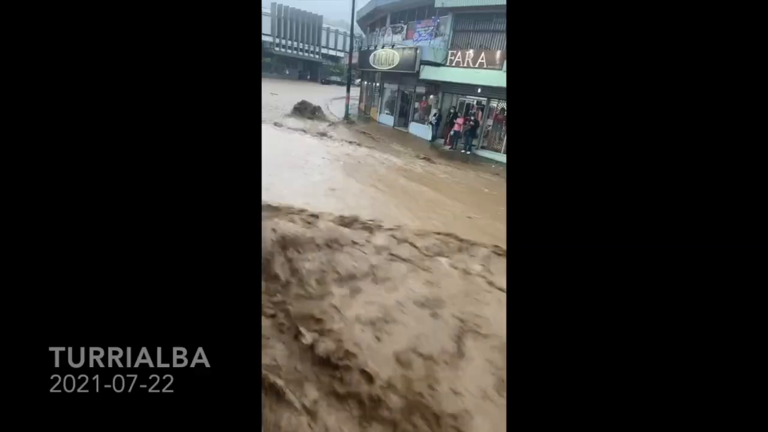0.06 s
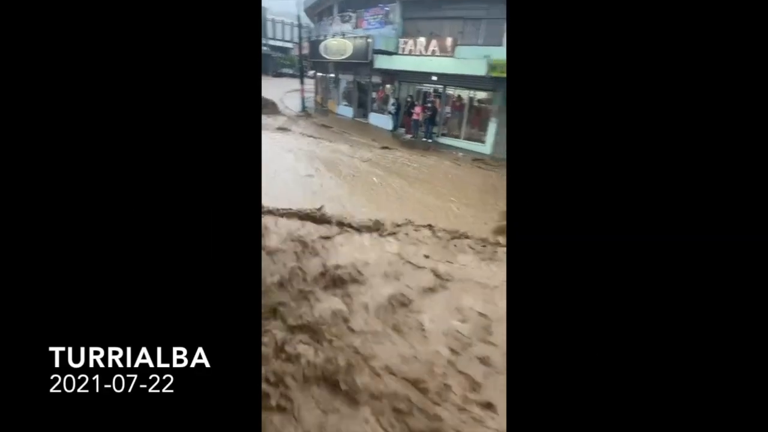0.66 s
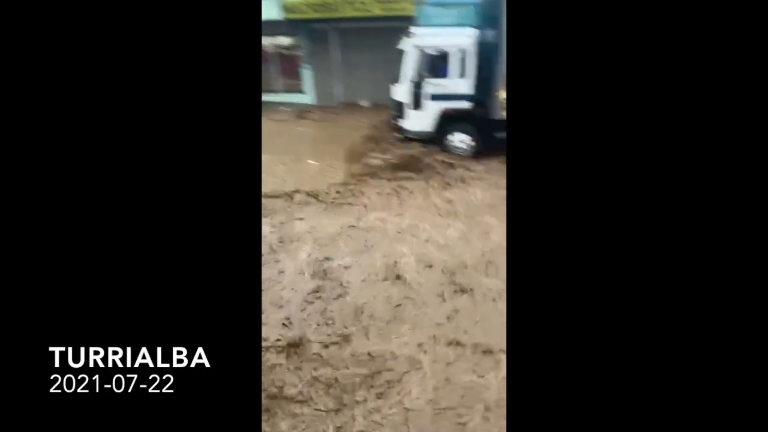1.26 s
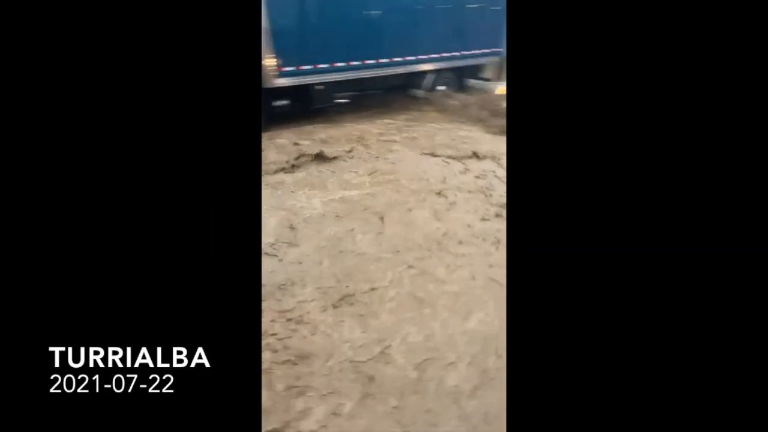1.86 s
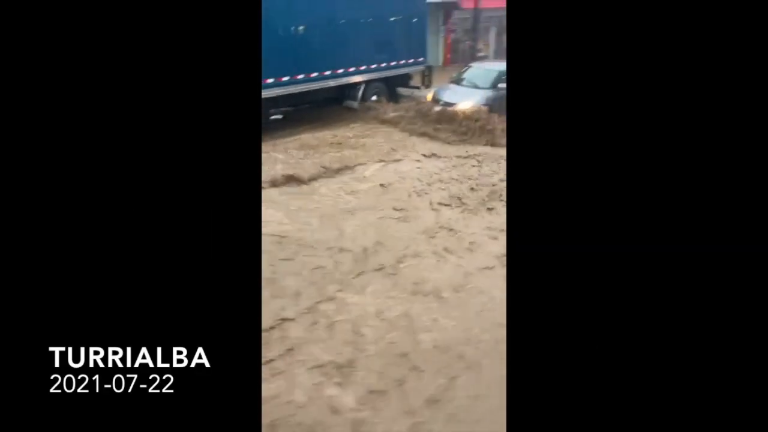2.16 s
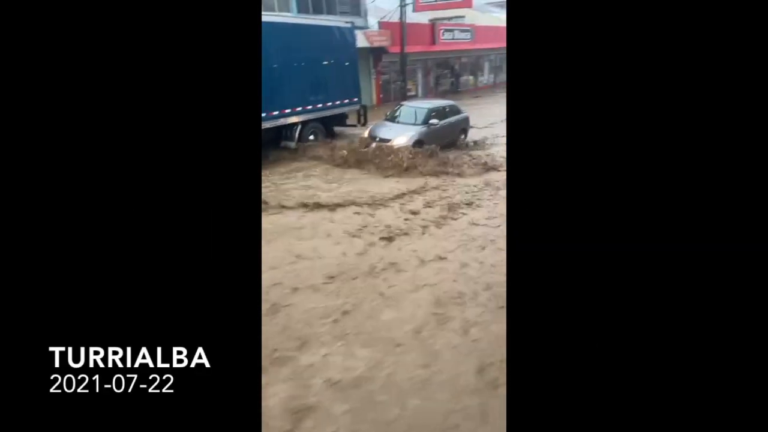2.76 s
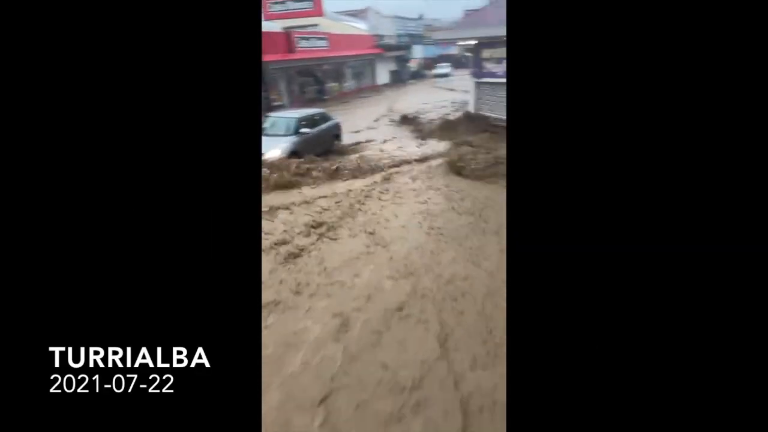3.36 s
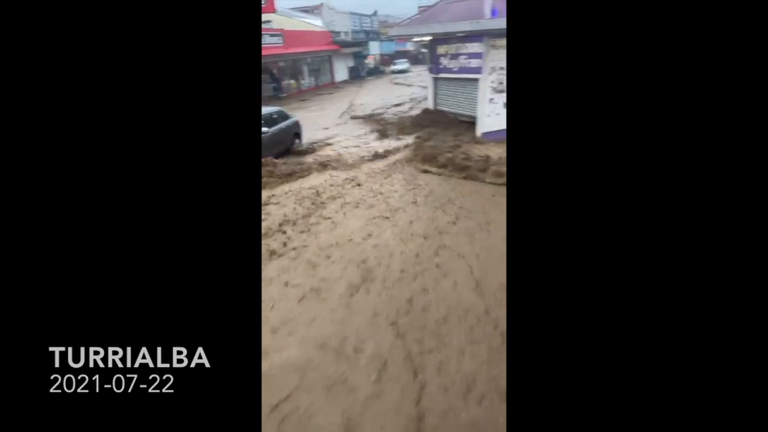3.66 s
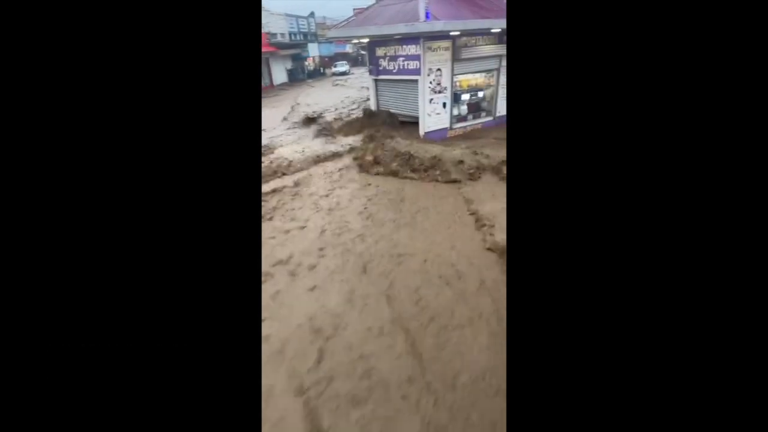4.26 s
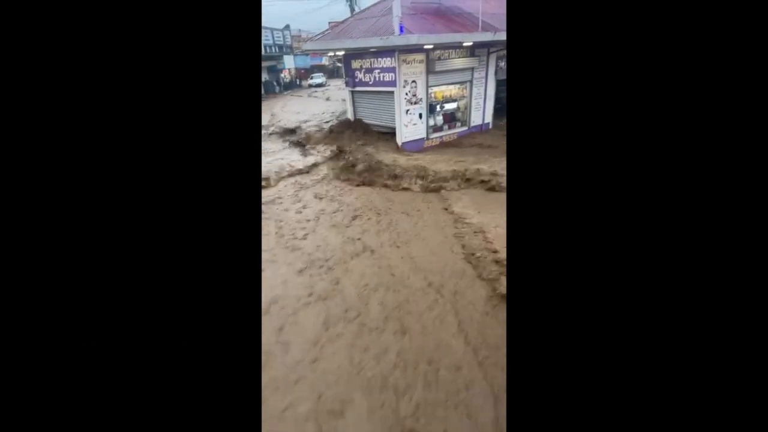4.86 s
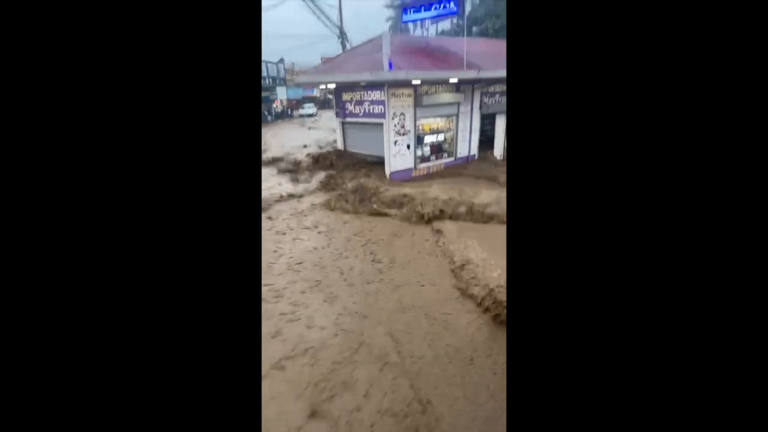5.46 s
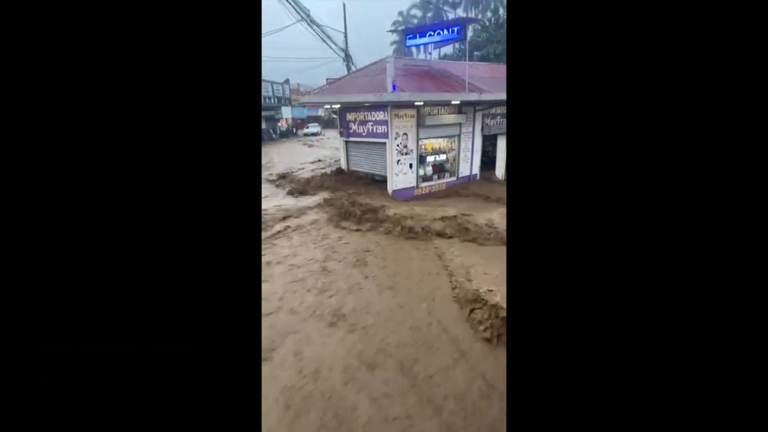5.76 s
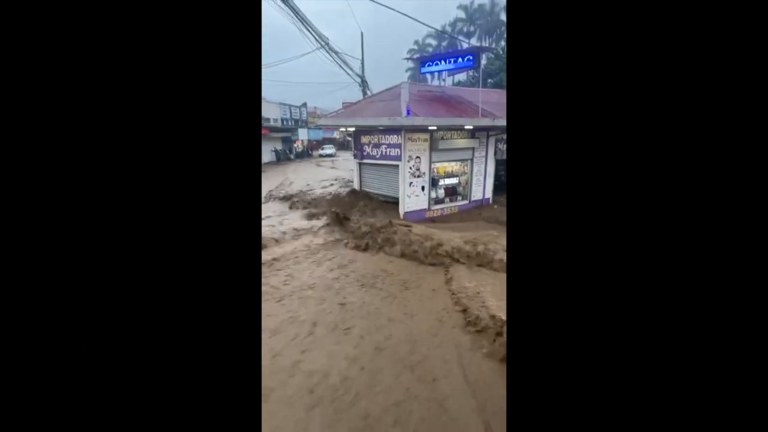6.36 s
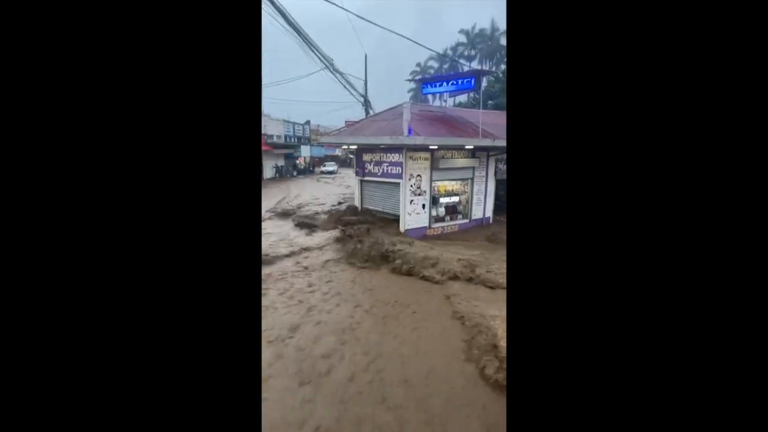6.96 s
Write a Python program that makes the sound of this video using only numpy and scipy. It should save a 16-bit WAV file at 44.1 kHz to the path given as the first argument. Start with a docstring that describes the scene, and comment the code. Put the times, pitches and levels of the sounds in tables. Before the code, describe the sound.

A loud torrent of floodwater is heard from the very start and runs steadily for about seven seconds, in mono, from above a town street. Its body is a dense, bubbling roar, with deep tumbling waves underneath and an even hiss of spray on top. A lorry's idling diesel adds a faint, steady low hum throughout, barely rising above the water.

The roar changes tone slightly as the microphone turns, first from about 1 to 1.5 seconds and again from about 3 to 4 seconds, while its loudness hardly moves. The spray is a little brighter near 1.8 seconds. Brief, slight swells of fizzing foam come at roughly 0.6, 1.2, 2.5, 4.4 and 5.6 seconds. From about 4.6 seconds, small uneven splashes against a shop wall slowly build, staying below the main roar, which continues at full strength to the end.

```python
"""Flood in a town street

A muddy flood heard from above, on one microphone that turns from the open street to a lorry,
then to a corner shop. Countless bubbles ring in the roar, standing waves tumble and trap air,
and spray hisses over it all. The lorry stands in the current with its diesel idling.
Now and then the fizz swells a little; late on, a wave builds against the shop wall."""
import sys
import numpy as np
from scipy import signal
from scipy.fft import rfft, irfft, next_fast_len
from scipy.io import wavfile

SR = 44100
rng = np.random.default_rng(int(sys.argv[2]) if len(sys.argv) > 2 else 0)


def transcribe(u):
    """Save the signal u as a 16-bit wav file named by the first command-line argument.

    u: samples, shape (n,) or (channels, n), limited to [-1, 1]; the rate is SR.
    q: integer samples, one column per channel.
    """
    v = np.clip(np.atleast_2d(u).T, -1, 1)
    q = np.round(v * 32767).astype(np.int16)
    wavfile.write(sys.argv[1], SR, q)


N = 313992
TIME = np.arange(N) / SR


def rush(to_lorry, to_corner, level_db=-13.5, low_edge_hz=310):
    """White water roars across the whole street; its colour shifts as the microphone turns."""
    # The roar facing the street, the lorry and the corner. Each row: frequency in Hz, relative level in dB.
    street = [(190, -4.5), (245, 6.5), (320, 1.5), (430, 0.5), (540, -1.9), (690, -5.5), (810, -2),
              (1000, -3.5), (1300, -6), (1700, -4.5), (1900, -7.5), (2100, -7.5), (2600, -13.5),
              (3800, -25.5), (4300, -30)]
    at_lorry = [(200, 1.5), (310, 0), (440, -4.5), (560, -3), (680, -0.5), (910, -4.5), (1180, -1.5),
                (1300, -3.5), (1730, -6.5), (2050, -8), (2600, -13.5), (3200, -19.5), (3800, -26.3),
                (4300, -29)]
    corner = [(200, 0.5), (290, -1), (440, -5), (530, -1.1), (680, -0.7), (770, -2.5), (930, -3),
              (1070, -2.5), (1600, -5), (2050, -8.5), (2600, -14), (3200, -19.5), (3800, -26.5),
              (4300, -29.5)]
    water = froth(296.3, 4260, per_s=4000, cycles=21.8, size_db=2, bubbles_db=-3.5, patchy_db=1.07, bands=22)
    water = signal.sosfilt(signal.butter(3, low_edge_hz, "high", fs=SR, output="sos"), water)
    roar = ((1 - to_lorry) * coloured(water, street)
            + (to_lorry - to_corner) * coloured(water, at_lorry)
            + to_corner * coloured(water, corner))
    surge_db = 0.21 * drift(11)
    return from_db(level_db + surge_db) * roar


def tumbling(to_lorry, level_db=-21, rise_db=0.66):
    """Waves fold over and gulp large pockets of air, a little louder off the open street."""
    # Heavy water falling over itself. Each row: frequency in Hz, relative level in dB.
    colour = [(20, -33.5), (48, -26), (64, -25.5), (72, -15.5), (92, -9.5), (125, -0.5), (180, 1),
              (250, 1.5), (340, -2), (450, -9.5), (700, -24.5)]
    pockets = froth(88.5, 603, per_s=800, cycles=18, size_db=2, bubbles_db=-4.5, patchy_db=1.6, bands=10)
    return from_db(level_db + rise_db * to_lorry) * coloured(pockets, colour)


def spray():
    """Flung drops land and tiny bubbles burst in a dense, even fizz."""
    # The hiss of the spray. Each row: frequency in Hz, relative level in dB.
    colour = [(4200, -12), (4600, -8.8), (4950, -3.4), (5350, -3.7), (6000, -.4), (6500, .9), (7000, -1.5),
              (7500, -6.5), (7750, -14)]
    # Loudest facing the lorry, which the current hits. Each row: time in seconds, level in dB rms.
    levels = [(0.1, -28.5), (1.0, -27.5), (1.8, -26), (2.1, -27.5), (2.6, -26.7), (3.0, -27.5), (3.25, -28),
              (4.4, -28), (6.5, -28.3)]
    fizz = froth(4020, 7000, per_s=3500, cycles=24, size_db=0, bubbles_db=3, patchy_db=1.45, bands=9)
    level_db = np.interp(TIME, *np.transpose(levels))
    flutter_db = 0.46 * drift(24)
    return from_db(level_db + flutter_db) * coloured(fizz, colour)


def lorry(firing_hz=28.79, wander=0.00371, waver_db=0.5):
    """Only the low harmonics of the idling diesel rise above the water."""
    # The engine's hum. Each row: multiple of the firing rate, level in dB rms.
    harmonics = [(2, -40), (3, -37), (4, -33), (5, -32.5), (7, -35.5), (8, -39), (9, -49)]
    firings = np.cumsum(firing_hz * (1 + wander * drift(1.1))) / SR
    hum = np.zeros(N)
    for multiple, db in harmonics:
        amplitude = np.sqrt(2) * from_db(db + waver_db * drift(2))
        hum += amplitude * np.sin(2 * np.pi * (multiple * firings + rng.random()))
    return hum


def wall_wave(start_s=4.6, growth_s=2.5, final_db=-25.5, slosh_db=3):
    """Water piles up against the shop in small uneven splashes."""
    # Splashing at the wall. Each row: frequency in Hz, relative level in dB.
    colour = [(1250, -11), (1650, 0), (2100, 0.5), (2600, -9.5), (3300, -17)]
    splashes = froth(1300, 3400, per_s=710, cycles=13, size_db=1, bubbles_db=0, patchy_db=0, bands=8)
    swell = ramp(start_s, growth_s) * from_db(final_db + slosh_db * drift(10))
    return swell * coloured(splashes, colour)


def foam_swells():
    """Brief, slight swells in the water's fizz of small bubbles."""
    # The swells. Each row: time of the peak in seconds, half-width in seconds, top level in dB rms.
    swells = [(0.56, 0.17, -27.5), (1.16, 0.07, -28.5), (2.54, 0.047, -27), (4.39, 0.099, -30),
              (5.64, 0.07, -27)]
    # The foam's colour. Each row: frequency in Hz, relative level in dB.
    colour = [(1400, -2), (2000, 2), (2900, -1), (3400, -6.5), (4200, -12), (5000, -12)]
    foam = froth(1400, 5000, per_s=1500, cycles=16, size_db=2, bubbles_db=-1, patchy_db=3.5, bands=8)
    envelope = sum(from_db(db) * np.exp(-((TIME - peak_s) / half_width) ** 2)
                   for peak_s, half_width, db in swells)
    return envelope * coloured(foam, colour)


def froth(low_hz, high_hz, per_s, cycles, size_db, bubbles_db, patchy_db, bands):
    """Near bubbles of many sizes ring in clumps over the smooth wash of the distant ones."""
    edges = np.geomspace(low_hz, high_hz, bands + 1)
    water = rng.standard_normal(N)
    for low, high in zip(edges, edges[1:]):
        hz = np.sqrt(low * high)
        born = rng.random(N) < per_s / bands / SR
        strength = from_db(size_db * np.minimum(rng.exponential(1, N), 4))
        clicks = born * strength * rng.choice([-1, 1], N)
        clumps = from_db(bubbles_db + patchy_db * drift(9.9))
        band_gain = np.sqrt(2 * (high - low) / SR)  # keeps the power per Hz even
        water += band_gain * clumps * rms_one(ring(clicks, hz, cycles / hz))
    return water


def ring(clicks, hz, t60):
    """A bubble: each click starts a tone that dies by 60 dB in t60 seconds."""
    decay = from_db(-60 / (t60 * SR))
    angle = 2 * np.pi * hz / SR
    return signal.lfilter([1, 0, -1], [1, -2 * decay * np.cos(angle), decay * decay], clicks + 1e-18)


def coloured(x, spectrum):
    """Shape a sound by rows of Hz and dB, falling 24 dB an octave past their ends; rms 1."""
    size = next_fast_len(N)
    octave = np.log2(np.maximum(np.arange(size // 2 + 1) * SR / size, 1))
    hz, db = np.transpose(spectrum)
    outside = np.abs(octave - np.clip(octave, np.log2(hz[0]), np.log2(hz[-1])))
    gain = from_db(np.interp(octave, np.log2(hz), db) - 24 * outside)
    return rms_one(irfft(rfft(x, size) * gain, size)[:N])


def drift(rate):
    """A slow random wander with spread 1, changing about rate times a second."""
    pole = np.exp(-80 * np.pi * rate / SR)
    noise = rng.standard_normal(N // 40 + 2002)  # one value every 40 samples
    slow = signal.lfilter([1], [1, -2 * pole, pole * pole], noise)[2000:]
    return np.interp(np.arange(N) / 40, np.arange(len(slow)), rms_one(slow))


def ramp(start_s, length_s):
    """A straight rise from 0 to 1."""
    return np.clip((TIME - start_s) / length_s, 0, 1)


def from_db(db):
    """Decibels to gain."""
    return 10 ** (np.asarray(db) / 20)


def rms_one(x):
    """The same sound at rms 1."""
    return x / np.sqrt(np.mean(x ** 2) + 1e-20)


def scene():
    """The steady flood and the lorry from above, in mono, as the microphone turns across them."""
    to_lorry = ramp(start_s=0.95, length_s=0.5)
    to_corner = ramp(start_s=2.8, length_s=1)
    flood = tumbling(to_lorry) + rush(to_lorry, to_corner) + wall_wave() + foam_swells()
    return (flood + spray() + lorry())[None]


def record(dry, ceiling=0.95, cutoff_hz=7580):
    """The microphone opens, peaks are slightly rounded and the top is cut."""
    opened = dry * ramp(start_s=0.069, length_s=0.0088)
    rounded = opened / (1 + (opened / ceiling) ** 6) ** (1 / 6)
    return signal.sosfilt(signal.ellip(12, .05, 90, cutoff_hz, fs=SR, output="sos"), rounded)


dry = scene()
out = record(dry)
transcribe(out)
```